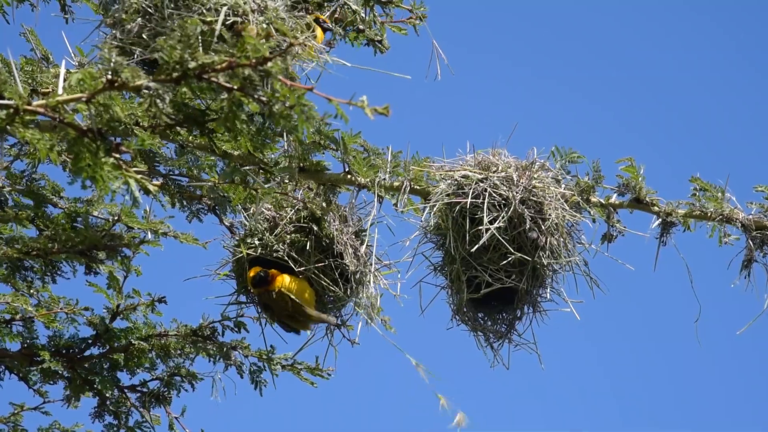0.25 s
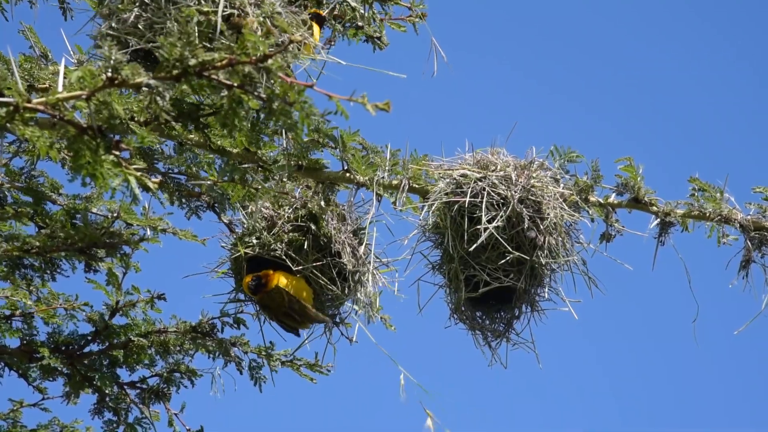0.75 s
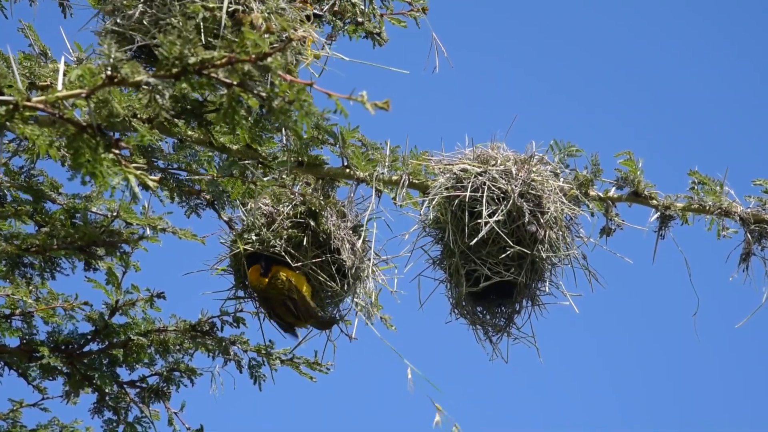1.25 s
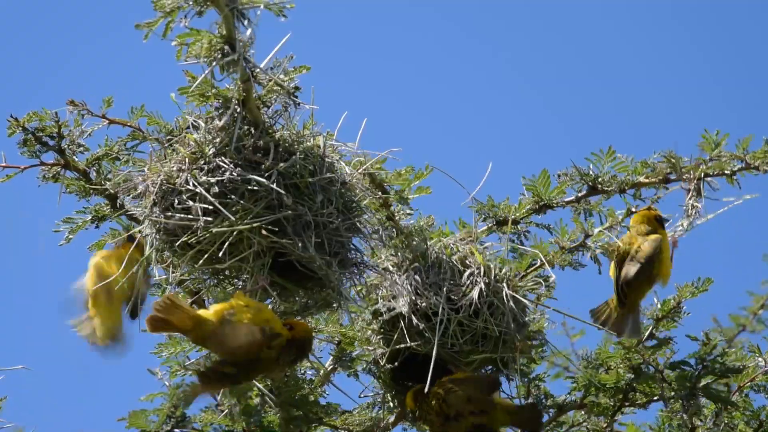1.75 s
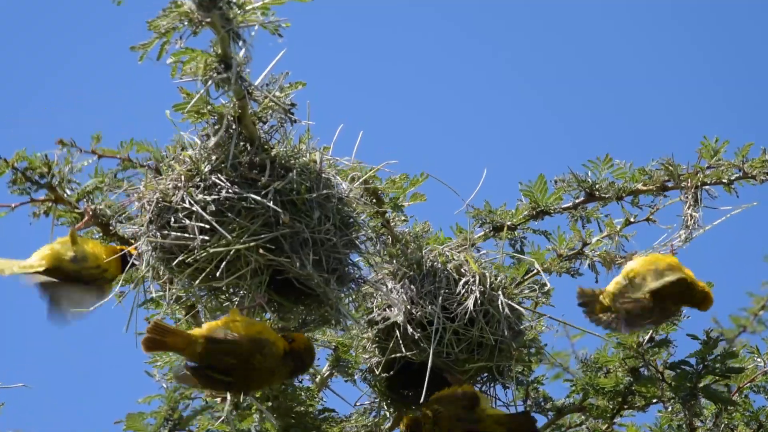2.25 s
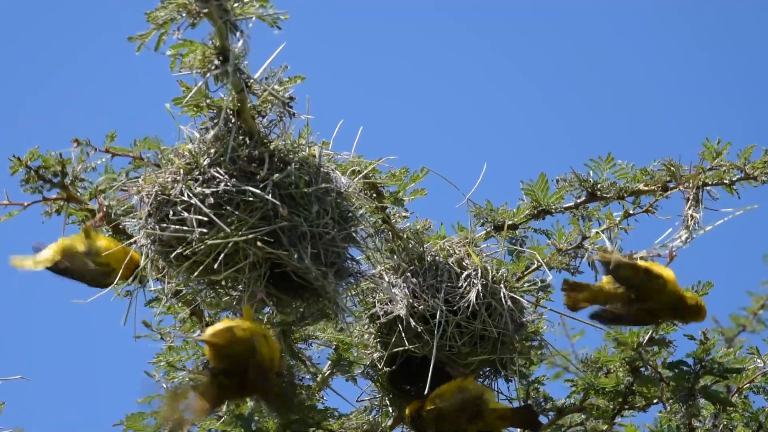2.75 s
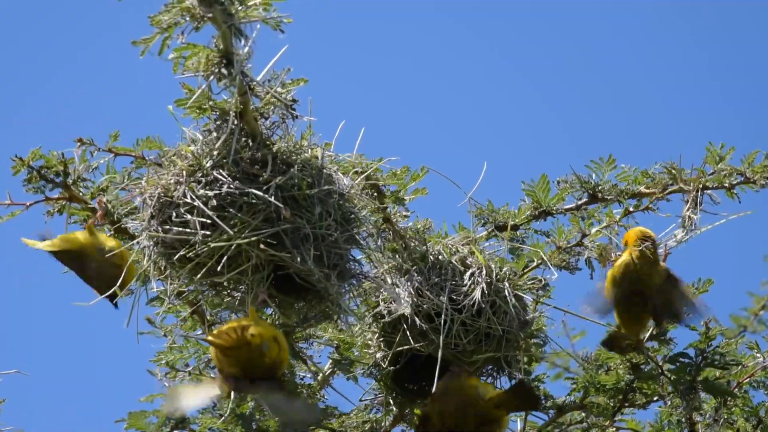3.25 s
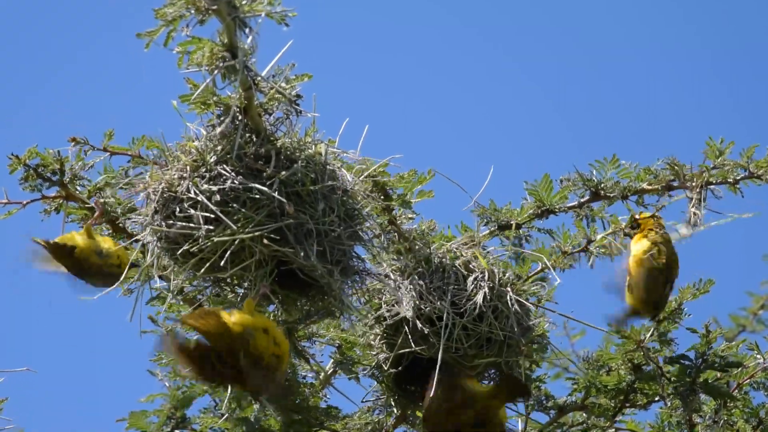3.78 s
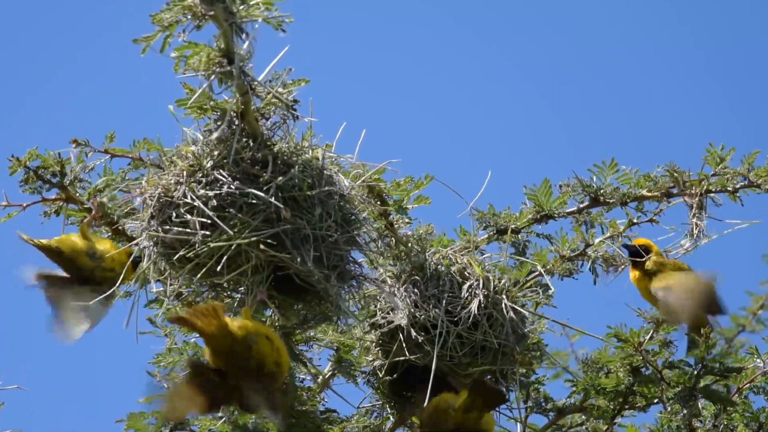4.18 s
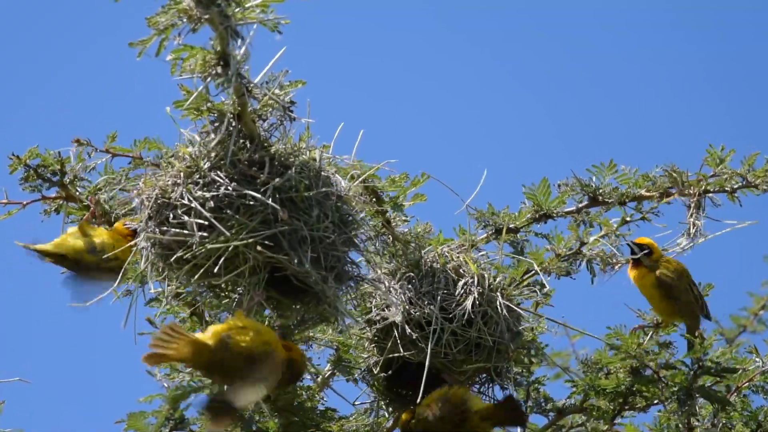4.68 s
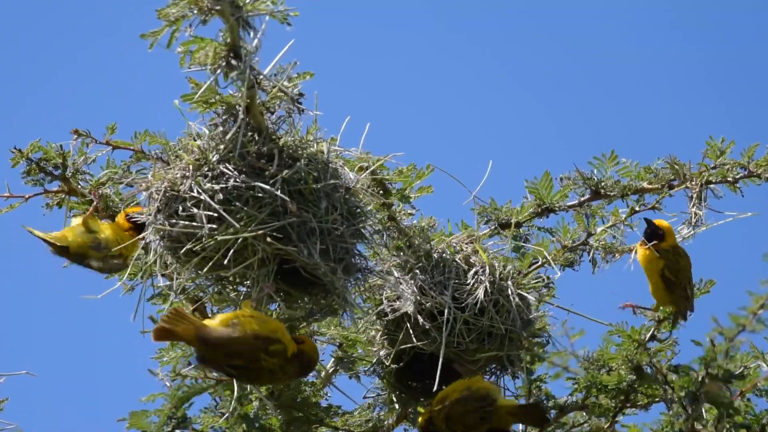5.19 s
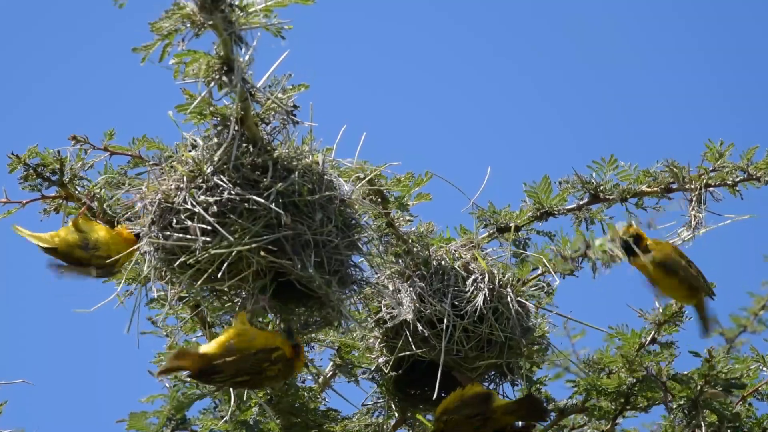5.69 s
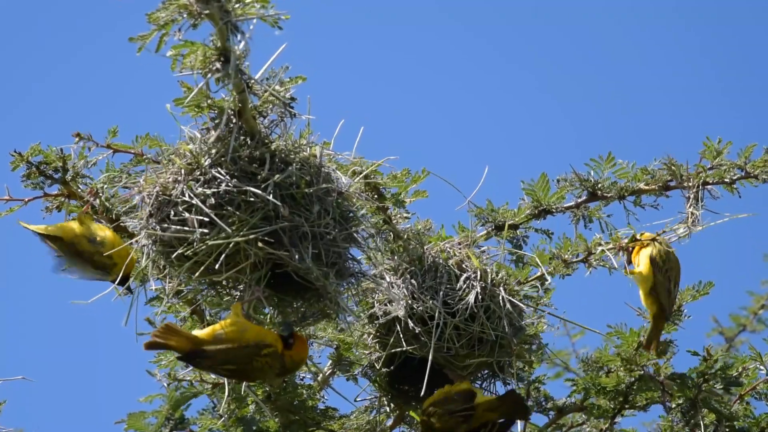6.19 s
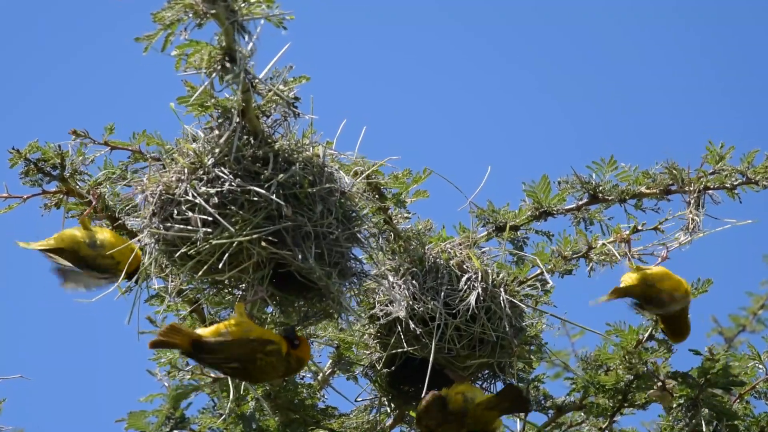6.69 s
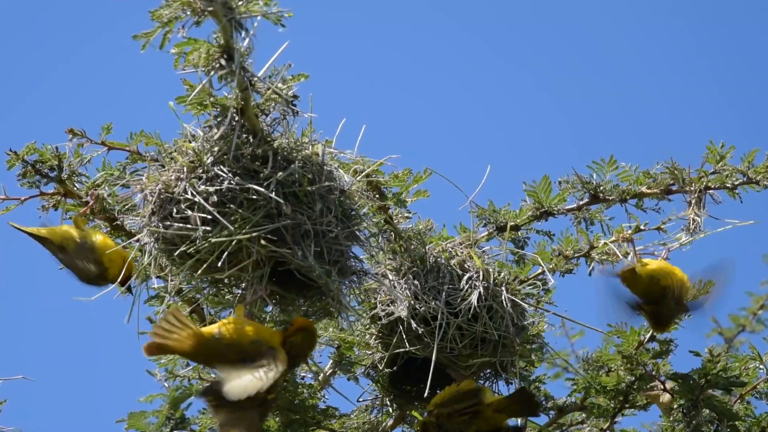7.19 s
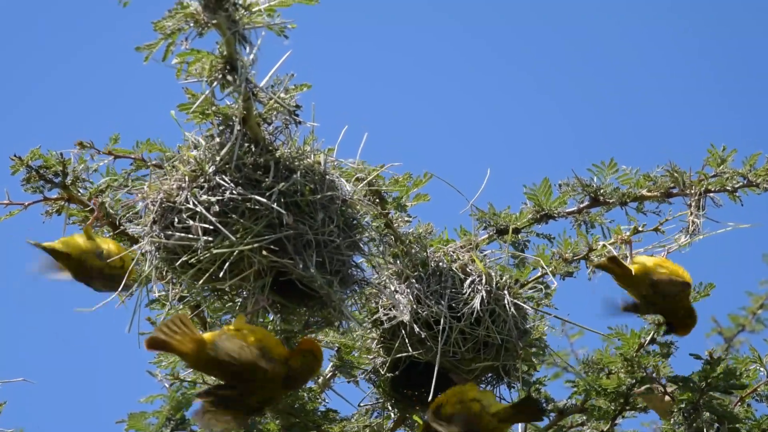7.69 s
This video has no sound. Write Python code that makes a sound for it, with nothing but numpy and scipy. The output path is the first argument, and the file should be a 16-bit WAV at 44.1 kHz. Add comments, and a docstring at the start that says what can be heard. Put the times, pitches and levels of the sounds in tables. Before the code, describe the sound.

A shrill insect drone with dry clucks gives way abruptly to busy, close chatter of a weaver colony: whistles, nasal wheezes and sharp flicks.

```python
"""Slurred whistles, nasal wheezes, sharp chips and dry chucks of a weaver colony in a thorn tree ring out
over farther birds' chatter. Gliding tones make the whistles and chips; stacked overtones make the hoarse notes.
Cicadas, ringing from fast trains of clicks, drone high on the left, loud at first, softer after a jump to
a second spot by the nests. A low fluted note sounds at the start; wings flutter briefly a few times.
Filtered noise gives a soft outdoor hush, and steady low tones give the microphone's faint hum."""
import sys
import numpy as np
from scipy import signal
from scipy.fft import rfft, irfft, next_fast_len
from scipy.io import wavfile
from scipy.ndimage import map_coordinates

SR = 44100
rng = np.random.default_rng(int(sys.argv[2]) if len(sys.argv) > 2 else 0)


def dump(signal):
    """Clip the signal to [-1, 1] and save it as 16-bit WAV at the path in sys.argv[1]."""
    limited = np.clip(np.atleast_2d(signal).T, -1, 1)
    pcm = np.round(limited * 32767).astype(np.int16)
    wavfile.write(sys.argv[1], SR, pcm)


N = 350154
TIME = np.arange(N) / SR
JUMP_S = 1.572  # moment of the jump to the second spot
TOP_HZ = 15200  # nothing sounds above this

# how notes bend: (start pitch [ratio to middle pitch], end pitch [ratio to middle pitch])
RISE = (.89, 1.08)
FALL = (1.15, .87)
DIVE = (1.3, .9)
CLOSE = (1.03, 0.92)
DROP = (1.03, 0.53)
ARCH = (0.93, 0.67)
HUMP = (0.9, .93)  # climbs, then falls back
LIFT = (0.98, 1.14)
SLIDE = (1.07, .91)
BOW = (0.81, 0.91)  # climbs, then eases down
SWEEP = (.81, 1.09)
CURL = (0.94, .69)
SAG, LEVEL = HUMP, BOW  # labels in the note tables; both bends climb, then come down
# how the throat colours overtones: (frequency [Hz], relative level [dB])
THROAT = [(700, -30), (2400, -5.5), (4800, 1), (6200, -1), (8500, -6), (14000, -36)]


def amp(db):
    """Turn decibels into a gain."""
    return 10 ** (np.asarray(db) / 20)


def unit(x):
    """Scale a sound to an average (rms) strength of 1."""
    return x / np.sqrt(np.mean(x ** 2) + 1e-20)


def along(points, hz):
    """Read a curve of (Hz, value) points, with frequency on a log axis."""
    f, v = np.transpose(points)
    return np.interp(np.log(hz + 1), np.log(f), v)


def wobble(rate, size):
    """A smooth random curve with `rate` random knots a second."""
    knots = rng.standard_normal(int(size * rate / SR) + 4)
    return map_coordinates(knots, [np.arange(size) * rate / SR])


def filtered(x, response):
    """Reshape a sound's spectrum with a gain that depends on frequency."""
    m = next_fast_len(N + SR // 2)
    spectrum = rfft(x, m) * response(np.fft.rfftfreq(m, 1 / SR))
    return irfft(spectrum, m)[..., :N]


def add(track, s, sound):
    """Mix a sound into a track at time s, cutting off what runs past the end."""
    part = track[..., round(s * SR):][..., :sound.shape[-1]]
    part += sound[..., :part.shape[-1]]


def tree(note, twigs_db=-4, tail_db=-9, t60=0.42, spread_db=2.1, count=12):
    """Branches and nests echo each note in their own way, with a short, fading tail behind it."""
    t = np.arange(SR // 3) / SR
    fade = amp(-60 * t / t60) * (1 - np.exp(-t / 0.0045))
    paths = rng.standard_normal((2, len(t))) * fade
    paths *= amp(tail_db) / np.linalg.norm(paths[0])
    for side in paths:
        delays = rng.exponential(.012, count)  # mean [s]
        echoes = rng.standard_normal(count) / np.sqrt(count)
        side[(delays * SR).astype(int) % len(t)] += amp(twigs_db) * echoes
    # the direct sound, on average a little to the left
    paths[:, 0] += amp(np.array([1, -1]) * (0.56 + spread_db * rng.standard_normal()))
    return signal.fftconvolve(note[None], paths, axes=1)


def air(level_db=-59.5):
    """Soft outdoor hush: shaped noise, nearly alike in both ears in the bass and separate in the treble."""
    # colour of the hush: (frequency [Hz], relative level [dB])
    hush_colour = [(25, -24), (70, 2.5), (200, 1.5), (450, -8), (1000, -3.5), (7000, -6.5), (15000, -65)]
    # how alike the two ears are: (frequency [Hz], left-right likeness [0 to 1])
    likeness = [(200, 1), (1500, 0.97), (9000, 0.047)]

    def middle_and_side(f):
        turn = np.arccos(np.clip(along(likeness, f), 0, 1)) / 2
        return amp(along(hush_colour, f)) * np.array([np.cos(turn), np.sin(turn)])

    mid, side = filtered(rng.standard_normal((2, N)), middle_and_side)
    return amp(level_db) * unit(np.array([mid + side, mid - side]))


def microphone_hum(second):
    """Steady low tones hum at levels that change as `second` goes from 0 to 1."""
    # hum tones: (pitch [Hz], level at first spot [dB], level at second spot [dB])
    hum_tones = [(49.6, -72, -63.5), (99, -65.5, -68), (199.8, -63, -67)]
    out = np.zeros(N)
    for hz, first_db, second_db in hum_tones:
        level_db = first_db + (second_db - first_db) * second
        out += amp(level_db) * unit(np.sin(2 * np.pi * hz * TIME))
    return out


def cicada(peaks, click_hz, width_hz, broad_db):
    """Tymbal ribs buckle in a fast, slightly uneven train of clicks and ring narrow resonances."""
    gaps = 1 + .06 * rng.standard_normal(int(click_hz * N / SR))
    beats = np.cumsum(gaps) / click_hz
    strengths = amp(rng.normal(0, 0.35, len(beats)))
    clicks = np.bincount((beats * SR).astype(int), strengths, N)[:N]
    t = TIME[:SR // 20]
    ring = np.zeros((2, len(t)))
    for hz, db in peaks:
        start_turns = rng.random((2, 1))  # each ear gets its own phase
        ring += amp(db - peaks[0][1]) * np.sin(2 * np.pi * (hz * t + start_turns))
    ring *= np.exp(-np.pi * width_hz * t)
    scatter = rng.standard_normal(ring.shape) * np.exp(-t / 0.0062)  # the click scattered by twigs
    band = signal.butter(2, [8700, 11200], "bandpass", fs=SR, output="sos")
    scatter = signal.sosfilt(band, scatter)
    one_click = unit(ring) + amp(broad_db) * unit(scatter)
    return unit(signal.fftconvolve(clicks[None], one_click, axes=1)[:, :N])


def cicadas(peaks, click_hz, width_hz, broad_db, left_db, count=3):
    """A few insects' click trains overlap into one drone, louder on the left by left_db."""
    # colour of the whole drone: (frequency [Hz], relative level [dB])
    drone_colour = [(7000, -36), (7700, 5.5), (8250, -6), (8550, 2), (13400, -1.5), (14500, -15.5)]
    chorus = sum(cicada(peaks, click_hz, width_hz, broad_db) for _ in range(count))
    chorus = unit(filtered(chorus, lambda f: amp(along(drone_colour, f))))
    return chorus * amp([[left_db / 2], [-left_db / 2]])


def cicada_drone(second):
    """The loud drone gives way to a softer one as `second` goes from 0 to 1."""
    # ringing of the first spot's insects: (frequency [Hz], level, used relative to the first row [dB])
    first_peaks = [(8683, -56.5), (8983, -59.5), (9098, -52), (9426, -54), (9835, -55.5), (9975, -53),
                   (10223, -55.5), (10864, -58), (11294, -63), (12096, -68)]
    # ringing of the second spot's insects: (frequency [Hz], level, used relative to the first row [dB])
    second_peaks = [(8522, -71), (8807, -72), (9200, -66.5), (9534, -77), (10266, -66.5)]
    near = cicadas(first_peaks, click_hz=431, width_hz=42, broad_db=-14, left_db=10)
    far = cicadas(second_peaks, click_hz=370.1, width_hz=150, broad_db=-2.5, left_db=9.0)
    return (1 - second) * amp(-32.0) * near + second * amp(-44.5) * far


def fluted_note(hz=1194, level_db=-44, octave_db=-14, fade_s=0.056):
    """A low steady tone with an octave, likely from a distant shrike, dies away among the trees."""
    t = TIME[:SR // 3]
    tone = np.sin(2 * np.pi * hz * t) + amp(octave_db) * np.sin(4 * np.pi * hz * t)
    loudness = np.exp(-(t / fade_s) ** 3) * (1 - np.exp(-t / 0.00014))
    note = amp(level_db) * unit(tone) * loudness
    out = np.zeros((2, N))
    add(out, 0, tree(note, twigs_db=-9, tail_db=-6.5, spread_db=3))
    return out


def wings(beat_hz=22, beat_depth=0.43):
    """Brief flurries of wingbeats: feathers rustle in the leaves and push a low whirr of air."""
    # flurries: (middle [s], half-width [s], rustle level before beating [dB], whirr level before beating [dB])
    flurry_rows = [(.66, 0.092, -89, -66), (2.47, 0.092, -57, -63), (5.58, 0.39, -67.5, -69)]

    def noise(colour):
        return unit(filtered(rng.standard_normal(N), lambda f: amp(along(colour, f))))

    rustle_colour = [(120, -27), (900, 13.5), (2500, 8.0), (12000, -37)]  # (frequency [Hz], level [dB])
    rustle = np.array([noise(rustle_colour) for _ in range(2)])
    whirr = noise([(120, -24), (260, -7), (1200, -41)])
    out = np.zeros((2, N))
    for s, width_s, rustle_db, whirr_db in flurry_rows:
        flurry = amp(rustle_db) * rustle + amp(whirr_db) * whirr
        out += flurry * np.exp(-((TIME - s) / width_s) ** 2)
    return out * (1 + beat_depth * np.sin(2 * np.pi * beat_hz * TIME))


def pitches(hz, contour):
    """Start, middle and end pitch of a note."""
    return hz * contour[0], hz, hz * contour[1]


def glide(length, start, middle, end, waver, waver_rate):
    """Pitch and phase of a note that arcs through three pitches, never quite steady."""
    u = np.linspace(0, 1, int(length * SR))
    arc = np.polyval(np.polyfit([0, .5, 1], [start, middle, end], 2), u)
    hz = arc * (1 + waver * wobble(waver_rate, len(u)))
    return hz, 2 * np.pi * np.cumsum(hz) / SR


def swell(size, roundness, skew):
    """The air pressure behind one note rises and falls; low roundness keeps it even."""
    return unit(np.abs(np.sin(np.pi * np.linspace(0, 1, size) ** skew)) ** roundness)


def overtones(hz, phase, colour, beak_hz=None, uneven_db=3.5):
    """Overtones shaped by the throat and the open beak; each one swells and fades on its own."""
    beak_db, beak_octaves = 7.5, 0.29  # height and width of the beak's resonance
    k = np.arange(1, int(TOP_HZ / hz.mean()) + 1)[:, None]
    db = along(colour, k * hz) + uneven_db * np.array([wobble(50.3, len(hz)) for _ in k])
    if beak_hz:
        db = db + beak_db * np.exp(-(np.log2(k * hz / beak_hz) / beak_octaves) ** 2)
    waves = np.sin(k * phase + 2 * np.pi * rng.random(k.shape))
    return unit((amp(db) * waves).sum(0))


def rasp(length):
    """The syrinx, the bird's voice organ, beats irregularly, so the overtones smear into a hoarse scold."""
    hz, phase = glide(length, 720, 740, 614.5, waver=0.0722, waver_rate=900)
    pressure = swell(len(hz), roundness=0.34, skew=0.84)
    return unit(overtones(hz, phase, THROAT) * pressure * amp(2.1 * wobble(222, len(hz))))


def chuck(beak_hz=None):
    """About ten slow pulses of the syrinx make one dry cluck."""
    # colour of the cluck: (frequency [Hz], relative level [dB])
    cluck_colour = [(600, -39), (1150, -2), (2800, 3), (6300, 4.5), (14000, -21)]
    hz, phase = glide(0.01895, 521, 560, 507, waver=0.061, waver_rate=688)
    return overtones(hz, phase, cluck_colour, beak_hz) * swell(len(hz), roundness=0.56, skew=0.88)


def chip(length=0.012, from_hz=7800, to_hz=4700, fall_s=0.002344):
    """A flick whose pitch plunges and lands on a brief ping."""
    t = TIME[:int(length * SR)]
    hz = to_hz + (from_hz - to_hz) * np.exp(-t / fall_s)
    hz = hz * (1 + 0.044 * wobble(494, len(t)))
    return unit(np.sin(2 * np.pi * np.cumsum(hz) / SR) * swell(len(t), roundness=0.38, skew=0.77))


def wheeze(length, start, middle, end, beak_hz):
    """A nasal note: a stack of overtones, with those near the beak's resonance picked out."""
    hz, phase = glide(length, start, middle, end, waver=.01, waver_rate=500)
    pressure = swell(len(hz), roundness=0.38, skew=1.0)
    return unit(overtones(hz, phase, THROAT, beak_hz) * pressure * amp(1.9 * wobble(152, len(hz))))


def whistle(length, start, middle, end, roundness=0.34, overtone_db=-27, flutter_db=2.0):
    """A slurred pure tone with a weak octave and a slightly frayed edge."""
    hz, phase = glide(length, start, middle, end, waver=.007, waver_rate=300)
    phase = phase + .2 * wobble(900, len(hz))
    tone = np.sin(phase) + amp(overtone_db) * np.sin(2 * phase)
    pressure = swell(len(hz), roundness, skew=0.98)
    return unit(tone * pressure * amp(flutter_db * wobble(166, len(hz))))


def far_note(kind):
    """One passing note of the flock: a rasp, a flick, a wheeze, a cluck or an arched slur."""
    length = rng.uniform(.025, 0.08)
    arc = np.exp(rng.normal([0, .1, -.12], 0.14))  # start, middle and end pitch ratios
    if kind == 0:
        return rasp(length)
    if kind == 1:
        return chip()
    if kind == 2:
        return amp(2.5) * wheeze(length, *(rng.uniform(700, 1600) * arc), rng.uniform(3000, 8500))
    if kind == 3:
        return chuck()
    return amp(-2.0) * whistle(length, *(rng.uniform(2900, 5000) * arc))


def far_birds(count=330):
    """The rest of the colony makes the same kinds of note, overlapping and more blurred by the tree."""
    # loudness of the chatter, joined by straight lines: (time [s], level [dB])
    chatter_levels = [(0.0, -64.5), (1.3, -51.5), (1.7, -46.5), (2.2, -49.5), (2.7, -43.5), (3.02, -48),
                      (3.3, -45.5), (4.4, -42.5), (5.35, -49), (5.75, -60.5), (6.17, -60), (6.6, -47),
                      (7.9, -49)]
    out = np.zeros((2, N))
    for i in range(count):
        s = (i + rng.random()) / count * N / SR
        note = tree(far_note(i % 6), twigs_db=1.5, tail_db=3.5)
        add(out, s, amp(rng.normal(0, 2.13)) * note)
    return unit(out) * amp(np.interp(TIME, *np.transpose(chatter_levels)))


def songs(level_db=-2.0):
    """A male slurs into a long whistle, snaps it off with a flick and adds a closing slur."""
    # phrases, levels before level_db: (held start [s], held pitch [Hz], held contour, held level [dB],
    # lead-in pitch [Hz], lead-in contour, lead-in level [dB],
    # closing start [s], closing contour, closing level [dB])
    phrases = [(1.754, 3733, RISE, -44, 4350, FALL, -37, 2.025, CLOSE, -42.5),
               (2.602, 3480, LIFT, -41, 5000, ARCH, -44.5, 2.852, CLOSE, -34.5),
               (4.027, 3487, LIFT, -43, 3850, CLOSE, -40.5, 4.275, CLOSE, -36.5),
               (7.065, 3490, LIFT, -44, 4500, ARCH, -46.5, 7.326, CLOSE, -38.5),
               (7.648, 3390, LIFT, -51, 4330, FALL, -40, 7.872, FALL, -42.5)]
    lead_ahead_s, lead_s = .06, 0.076  # the lead-in runs into the held note
    held_s = .195
    flick_ahead_s, flick_db = .054, -1  # time before the closing slur, level over that slur
    close_s, close_hz = .053, 4380  # length and pitch of the closing slur
    out = np.zeros((2, N))
    for start, held_hz, held, held_db, lead_hz, lead, lead_db, close_start, close, close_db in phrases:
        lead_in = whistle(lead_s, *pitches(lead_hz, lead))
        add(out, start - lead_ahead_s, amp(lead_db) * tree(lead_in))
        held_note = whistle(held_s, *pitches(held_hz, held), roundness=0.094)  # even pressure
        add(out, start, amp(held_db) * tree(held_note))
        add(out, close_start - flick_ahead_s, amp(close_db + flick_db) * tree(chip()))
        closing = whistle(close_s, *pitches(close_hz, close))
        add(out, close_start, amp(close_db) * tree(closing))
    return amp(level_db) * out


def near_birds(whistle_db=-1, wheeze_db=0.0, chip_db=-2, rasp_db=-1):
    """The closest birds sing phrases and call single notes; the _db settings trim each kind of call."""
    # single pure notes: (time [s], length [s], pitch [Hz], contour, level before trim [dB])
    whistle_notes = [(0.008, 0.028, 3830, LEVEL, -53.5), (.098, 0.038, 4400, SLIDE, -62),
                     (1.032, 0.036, 4620, SAG, -51.5), (1.143, 0.13, 4503, CURL, -46),
                     (1.222, 0.058, 4650, SAG, -48), (1.338, 0.065, 7440, RISE, -53),
                     (1.489, 0.074, 4610, SLIDE, -53), (1.595, 0.042, 6900, SWEEP, -49),
                     (1.636, .06, 4520, DROP, -44.5), (1.679, 0.029, 6200, RISE, -43.5),
                     (1.92, 0.036, 3520, RISE, -47), (2.116, 0.051, 3840, ARCH, -41.5),
                     (2.241, 0.027, 3600, ARCH, -47), (2.339, 0.038, 3550, RISE, -44),
                     (2.892, 0.023, 3540, FALL, -41.5), (3.264, 0.053, 5110, SAG, -41),
                     (3.33, 0.06, 3500, SLIDE, -45.5), (3.402, 0.073, 4560, DROP, -43.5),
                     (3.459, 0.074, 4530, SLIDE, -45), (3.55, 0.079, 3760, RISE, -42),
                     (3.625, 0.069, 4180, CLOSE, -38.5), (3.708, 0.068, 4440, DROP, -45.5),
                     (3.815, 0.061, 4290, LEVEL, -43), (4.324, 0.068, 4680, SAG, -45.5),
                     (4.45, 0.056, 4640, DROP, -49.5), (4.673, 0.04, 3600, DIVE, -47),
                     (4.736, .04, 4100, FALL, -46.5), (4.775, 0.018, 3260, FALL, -47),
                     (5.157, 0.12, 3220, LIFT, -52), (6.233, .11, 5080, SWEEP, -39.5),
                     (6.345, 0.14, 5920, LIFT, -50.5), (6.352, 0.058, 3400, ARCH, -48.5),
                     (6.445, .038, 2870, ARCH, -53), (6.453, 0.042, 6510, LIFT, -40),
                     (6.572, .036, 4700, ARCH, -49), (6.62, 0.021, 3900, SWEEP, -46),
                     (6.637, 0.061, 4820, RISE, -35), (6.787, 0.026, 6250, FALL, -51),
                     (6.817, .052, 4150, DIVE, -35), (7.858, 0.072, 3495, SAG, -44)]
    # nasal notes: (time [s], length [s], pitch [Hz], contour, beak resonance [Hz], level before trim [dB])
    wheeze_notes = [(1.973, 0.04, 2920, SAG, 5700, -41.5), (3.134, 0.042, 1464, DROP, 4400, -40),
                    (3.202, 0.042, 2850, ARCH, 5750, -44.5), (3.249, .11, 830, SWEEP, 3500, -43),
                    (3.3, .044, 2680, CURL, 5360, -48), (4.161, 0.052, 977, RISE, 4830, -44),
                    (4.545, .04, 2780, DROP, 5650, -46.5), (4.609, 0.067, 2703, SAG, 6400, -47),
                    (4.836, 0.1, 1346, LEVEL, 4100, -48), (5.578, 0.044, 2300, SLIDE, 7000, -48)]
    # very fast downward flicks, single or in a quick run: (time [s], level before trim [dB])
    chip_notes = [(.68, -52), (1.636, -39), (2.049, -48), (2.062, -41), (2.075, -41), (3.398, -37.5),
                  (4.281, -41), (7.459, -48)]
    # dry, low-pitched clucks in loose runs: (time [s])
    chuck_times = [0.191, 0.343, 0.463, 0.566, 0.697, 0.818, 0.947, 1.078, 1.263, 5.434, 5.56, 5.664, 5.784,
                   5.893, 5.995, 6.116, 6.973, 7.447]
    # hoarse scolding: (time [s], length [s], level before trim [dB])
    rasp_notes = [(2.966, 0.046, -44), (3.043, 0.049, -46.5), (3.116, 0.055, -43), (3.49, 0.11, -47.5),
                  (3.709, .11, -45), (3.877, 0.023, -42), (5.211, 0.15, -52), (6.916, 0.057, -50.5)]
    out = songs()
    for s, length, hz, contour, db in whistle_notes:
        add(out, s, amp(db + whistle_db) * tree(whistle(length, *pitches(hz, contour))))
    for s, length, hz, contour, beak_hz, db in wheeze_notes:
        add(out, s, amp(db + wheeze_db) * tree(wheeze(length, *pitches(hz, contour), beak_hz)))
    for s, db in chip_notes:
        add(out, s, amp(db + chip_db) * tree(chip()))
    for s in chuck_times:
        # the clucking bird at each spot: beak resonance [Hz], level [dB]
        beak_hz, db = (4300, -49.5) if s < JUMP_S else (6000, -46.5)
        add(out, s, amp(db) * tree(chuck(beak_hz)))
    for s, length, db in rasp_notes:
        add(out, s, amp(db + rasp_db) * tree(rasp(length)))
    return out


def scene():
    """Birds over hush, cicadas and hum; drone and hum change quickly at the jump."""
    second = np.clip((TIME - JUMP_S) / 0.0024, 0, 1)  # 0 at the first spot, 1 at the second
    background = air() + microphone_hum(second) + cicada_drone(second)
    return background + fluted_note() + wings() + far_birds() + near_birds()


def record(dry):
    """Nothing is kept above the band limit."""
    return filtered(dry, lambda f: f < TOP_HZ)


dry = scene()
out = record(dry)
dump(out)
```